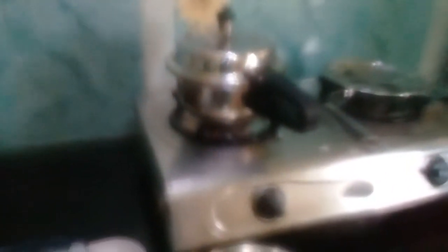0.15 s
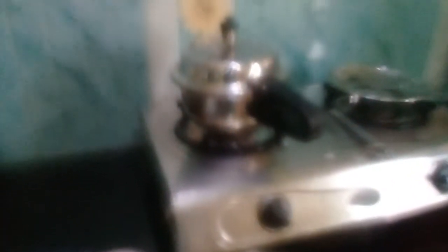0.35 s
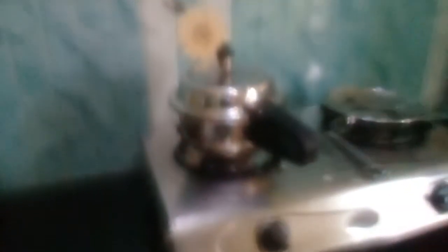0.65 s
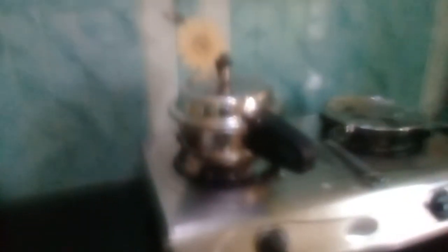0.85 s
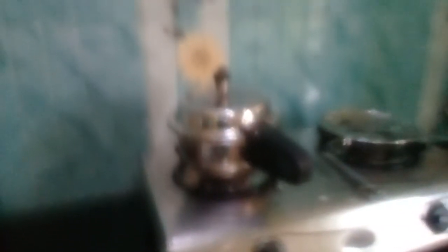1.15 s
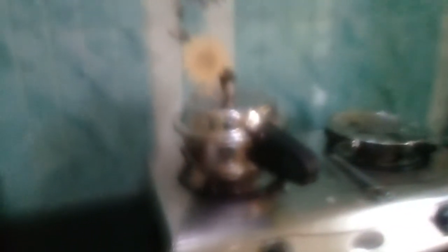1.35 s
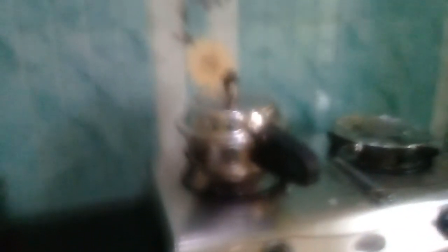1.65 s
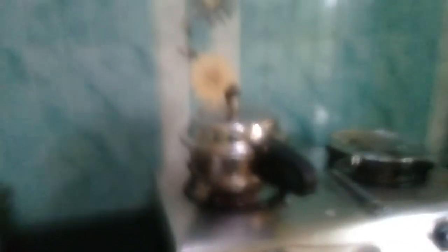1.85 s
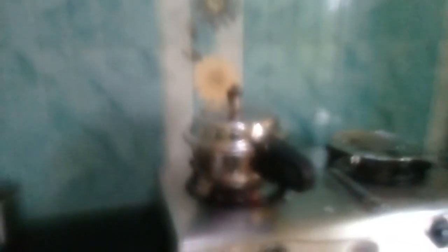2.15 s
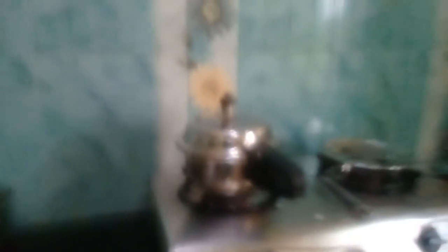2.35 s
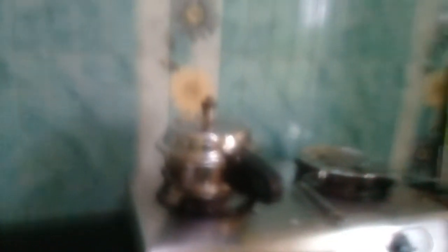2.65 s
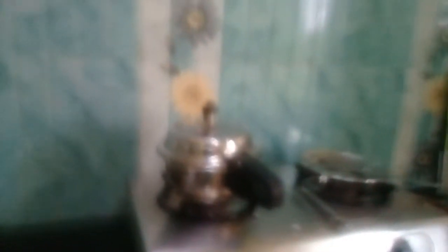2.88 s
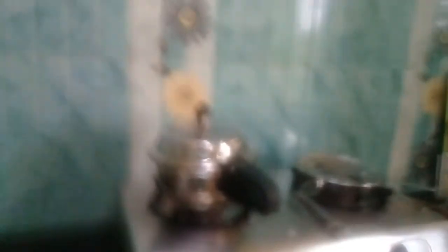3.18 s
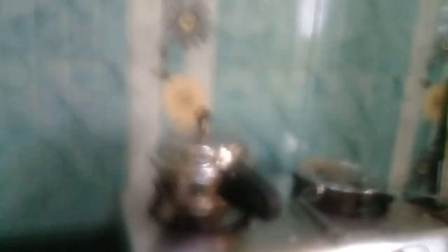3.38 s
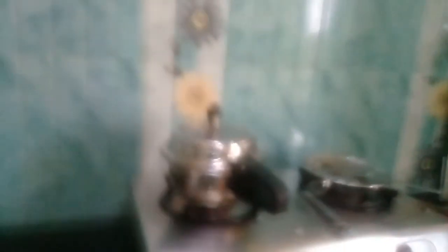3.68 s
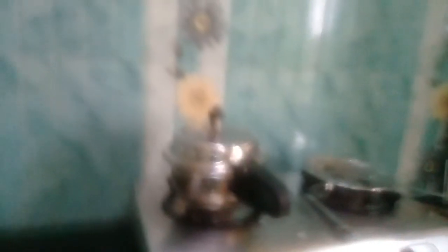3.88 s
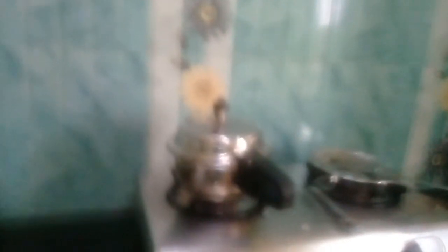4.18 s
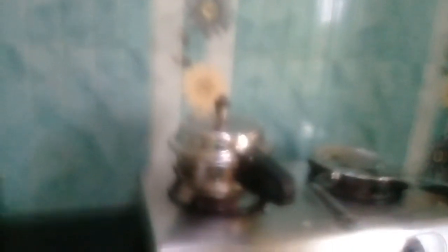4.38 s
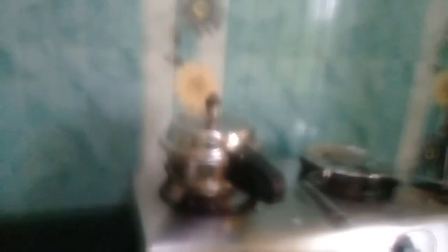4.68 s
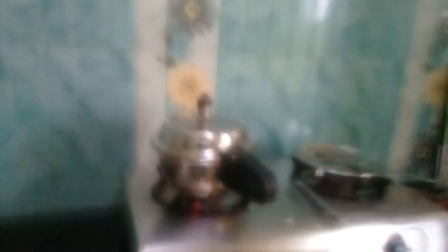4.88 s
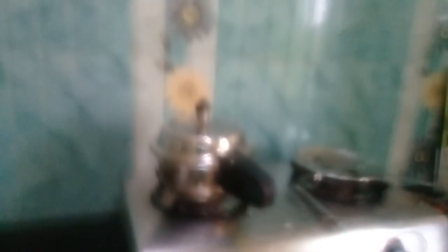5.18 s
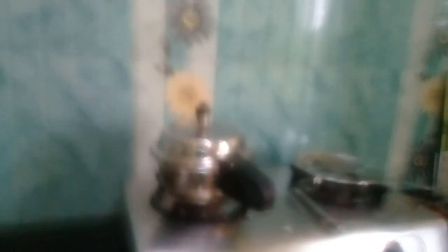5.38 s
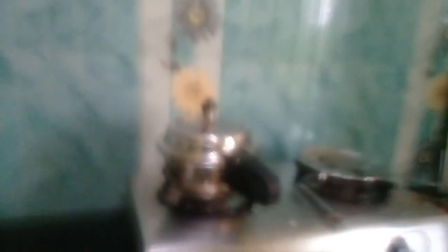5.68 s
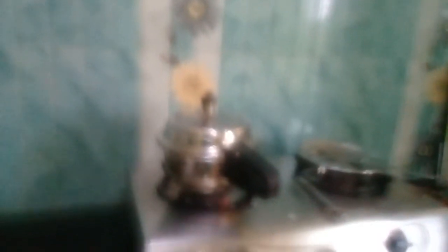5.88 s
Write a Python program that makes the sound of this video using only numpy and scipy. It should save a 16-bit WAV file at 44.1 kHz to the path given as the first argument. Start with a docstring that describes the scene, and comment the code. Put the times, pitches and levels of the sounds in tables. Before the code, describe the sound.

A small pressure cooker on a gas stove wheezes faintly, then its steam hiss swells into a strong, bright, fluttering jet over a low flame rumble.

```python
"""Pressure cooker on a gas flame

A small pressure cooker comes up to pressure in a tiled kitchen, heard by one hand-held microphone.
Steam under the weight valve, made of shaped noise, is first reedy wheezes through the resonant seat,
then a growing hiss that swings as the weight rocks, with thin whistles and bright wet puffs.
Decaying modes make a board's dull bumps and the pot's brief ticks; the board also scrapes.
Below lie the burner's rumble, as low shaped noise, and a mains hum of wavering sine tones."""
import sys
import numpy as np
from scipy import signal
from scipy.fft import rfft, irfft, next_fast_len
from scipy.io import wavfile
from scipy.ndimage import map_coordinates

SR = 44100
rng = np.random.default_rng(int(sys.argv[2]) if len(sys.argv) > 2 else 0)


def int16_out(signal):
    """Quantize to a 16-bit WAV file."""
    q = np.round(np.clip(np.atleast_2d(signal).T, -1, 1) * 32767)
    wavfile.write(sys.argv[1], SR, q.astype(np.int16))


N = 265923
TIME = np.arange(N) / SR  # s

# steam flow, building with pressure until the weight holds it: t/s, level/dB re full flow
FLOW = [(0, -20.5), (.22, -19), (.4, -17), (.84, -12.2), (1.12, -11), (1.36, -11), (1.5, -8), (1.95, -6.5),
        (2.45, -5), (3.0, -3.5), (3.35, -2.9), (3.9, -2.5), (4.3, -0.5), (4.75, 0.1), (5.05, -0.3),
        (5.3, 0.15), (5.75, 0.25), (6.03, -0.2)]
# steam lifts the weight, which rocks back: t/s, period of one rock/s, swing of the flow/dB
LIFTS = [(.315, .09, 1.5), (.6, .1, 1), (1.43, .1, 1.6), (1.625, 0.16, 2), (2.295, .11, 3),
         (2.41, .11, 0.5), (2.53, .11, 0.5), (2.645, 0.12, 2.5), (2.75, 0.095, 1.3), (3.105, 0.1, 1.3),
         (3.325, 0.21, 1.5), (3.52, .12, 0.3), (3.685, .1, 0.5), (3.805, 0.12, 1.3), (3.96, 0.15, 2.5),
         (4.09, 0.093, 2.3), (4.28, 0.13, 0.5), (4.495, 0.13, 3.5), (4.625, 0.1, 2), (4.76, 0.21, 1),
         (5.145, 0.12, 2.5), (5.64, .14, 0.5), (5.85, 0.19, 2), (6.0, .12, 4.5)]
ROCKS_TO_DECAY = 0.86  # rocks until the swing has fallen to 1/e
# the weight sinks back and chokes the jet: t/s of the centre, length/s, change of flow/dB
SETTLES = [(2.13, .2, -0.7), (2.818, .06, -2), (4.17, 0.11, -2), (5.092, .06, -0.3)]

# spectrum of the jet's hiss: f/Hz, relative level per Hz/dB
HISS_SPECTRUM = [(1500, -31.5), (2600, -17), (3600, -6.5), (5000, -6), (5600, -2.5), (6250, -0.5),
                 (7000, -3.5), (7650, 1), (8500, -1.5), (9300, 0), (10000, -0.5), (10800, -7),
                 (12000, -16.5), (16000, -38)]
# spectrum of the plume's lower rush: f/Hz, relative level per Hz/dB
RUSH_SPECTRUM = [(400, -16), (800, -10.5), (1200, -14), (1520, -9), (1900, 0), (2300, -2), (2700, 0.5),
                 (3400, -7.5), (5000, -17), (8000, -28)]
# spectrum of the finest spray: f/Hz, relative level per Hz/dB
SPRAY_SPECTRUM = [(9500, -39), (11200, -1), (11900, -4), (12300, -0.5), (12700, 1), (13050, -6),
                  (13400, -3), (13800, -1), (14200, -8), (15100, -4.5), (15600, -4.5)]
# narrow tones of the vent: f/Hz, relative level/dB
VENT_TONES = [(6104, 2), (6180, 0), (6295, 3.5), (6358, 2), (6667, 1), (6971, 0), (7331, 0), (7530, 1),
              (7714, 4), (8092, 3), (8587, 2), (9075, 1), (9190, 0), (9528, 2), (9881, 0)]
JET_DB = -38.0  # hiss at full flow
PLUME_DB, PLUME_GROWTH = -52, 0.5  # dB at full flow, dB per dB of flow
UNFORMED_DB, FORM_S = -9, 1  # the plume's shortfall at the start, and the time until it is formed
# the plume's rush swells and thins: t/s of the centre, length/s, level/dB
PLUME_DRIFT = [(.2, .35, -0.5), (1.0, 0.44, 1.5), (1.9, 0.63, -1.5), (2.52, .14, 2), (3.2, 0.28, -2),
               (3.62, 0.13, 0), (4.803, 0.12, 1), (5.22, 0.19, -1.5), (5.66, 0.3, 1.5)]

# resonances of the valve seat: f/Hz, half-width/Hz, relative level/dB
SEAT_MODES = [(2836, 110, 0.5), (3150, 300, -4), (3560, 105, 0.5), (4060, 50, -7), (4200, 800, -13.5)]
# wheezes through the seat: t/s, time held/s, level/dB, pitch ratio
WHEEZES = [(-0.08, 0.07, -50, 1.04), (.525, 0.17, -51.3, 1), (.76, 0.1, -56.5, 1), (1.68, 0.15, -49.5, .99),
           (1.91, 0.16, -55, 1.03), (2.5, 0.06, -54.5, 1), (4.1, .2, -52.5, 1), (5.08, 0.13, -48.5, .98)]
WHEEZE_ATTACK_S, WHEEZE_RELEASE_S = 0.093, 0.18
LEAK_DB, LEAK_GROWTH = -55, 0.95  # the seat's leak, growing with the flow: dB at full flow, dB per dB
# brief whistles of the valve: t/s of the centre, length/s, f/Hz, level/dB
WHISTLES = [(0.06, 0.26, 3740, -62), (.03, .22, 4240, -62), (.69, 0.22, 2850, -56), (.65, .12, 3550, -57.5),
            (.87, 0.17, 3550, -57), (.72, .34, 4060, -63), (1.83, 0.1, 2950, -57), (2.09, .16, 3660, -59),
            (2.59, .1, 2830, -57), (3.45, 0.24, 2606, -55)]

# puffs of wet steam: t/s, rise/s, level/dB
SPURTS = [(2.297, .015, -52), (3.697, .006, -41), (3.95, 0.032, -49), (4.24, 0.033, -51),
          (4.47, 0.051, -45.5), (5.24, .03, -46), (5.83, 0.048, -42.5)]
# spectrum of a puff's bright front: f/Hz, relative level per Hz/dB
SPURT_SPECTRUM = [(1000, -16), (2200, -5), (3500, 5), (4500, 6), (6000, -10), (11000, 5), (15000, -28)]
SPURT_DECAY_S, SPURT_TAIL_S = 0.051, 0.17  # time constants of the bright front and the dull tail

# dull bumps of the board: t/s, level/dB, pitch ratio
BUMPS = [(4.339, -33.5, 0.97), (4.349, -37.5, 1.0), (4.38, -32, 1.04), (4.404, -40, 1.12),
         (4.416, -38, 1.06), (4.476, -35.5, 1.2), (4.5, -44, 1.2), (4.518, -40, .88), (4.588, -45, 1.25)]
# modes of the board's short thud: f/Hz, relative level/dB, t60/s
BOARD_MODES = [(111, -14, 0.094), (290, -17, .045), (388, -9, 0.05), (425.6, -5.5, 0.072), (473, -16, .045)]
# modes of the board's lasting ring: f/Hz, relative level/dB, t60/s
BOARD_RING = [(263, -25, .45), (388, -27, .35), (423, -24, .35), (452, -28, .3), (512, -30, .3)]
# soft scrapes of the board: t/s of the centre, length/s, level/dB
SCRAPES = [(2.974, 0.27, -65), (4.43, 0.086, -54)]
# ticks of the pot: t/s, level/dB, pitch ratio
TICKS = [(5.7128, -34, 1), (5.7182, -33.5, 1.0), (5.728, -41, 0.97), (5.752, -38.5, 0.98)]
# modes of the pot: f/Hz, relative level/dB, t60/s
POT_MODES = [(970, -5, .026), (1110, -2, .034), (1285, -6.5, 0.022), (1950, -8, 0.025)]

# spectrum of the flame's rumble: f/Hz, relative level per Hz/dB
FLAME_SPECTRUM = [(15, -32), (45, -14), (60, -12.5), (86, -1.5), (115, -4.5), (160, -0.5), (225, -0.5),
                  (262, 0), (290, -4), (450, -8), (700, -12), (2000, -21), (8000, -31), (16000, -50)]
# low resonances in which the flame throbs: f/Hz, half-width/Hz, relative level/dB
THROB_MODES = [(194, 17, -0.5), (227, 18, 1), (263.5, 5.4, 0.5)]
# flares of the flame: t/s of the centre, length/s, level/dB
FLARES = [(0.362, .07, 3), (0.848, 0.96, 1.5), (1.05, .12, 1), (1.32, 0.15, 2), (1.78, 0.17, 1.5),
          (2.267, 0.34, 3), (2.9, 0.37, 3), (3.783, 0.17, 2.5), (4.036, 0.46, 5), (4.478, 0.31, 5),
          (5.54, 0.11, 1.5), (5.83, 0.22, 2), (.15, .2, 2.5)]
FLAME_DB, THROB_DB, DRONE_DB = -61.5, -65, -70  # flame and throb waver about these levels

# mains hum, lowest line first: f/Hz, level/dB
HUM_LINES = [(98.7, -63.5), (149.3, -64.5), (200, -70.5)]
# swells and fades of the lowest hum: t/s of the centre, length/s, level/dB
HUM_SWELLS = [(.33, .12, -7), (.62, .36, 1), (1.0, .14, 3), (1.32, .3, -5), (1.65, .1, -7), (1.92, .12, -7),
              (2.38, .14, -8), (2.7, .1, -7), (2.98, .1, -9), (3.7, .22, 4), (4.33, .2, 3), (4.52, .12, -5),
              (4.92, .12, -6), (5.5, .5, -3)]

TOP_HZ = 15750  # band limit of the recorder


def flow():
    """Pressure-driven flow in dB re full, swung by the damped oscillation of the rocking weight."""
    flow_db = np.interp(TIME, *np.transpose(FLOW))
    for s, period, swing_db in LIFTS:
        rocks = np.maximum(TIME - s, 0) / period
        decay = np.exp(-(rocks / ROCKS_TO_DECAY) ** 2)
        flow_db = flow_db + swing_db * np.sin(2 * np.pi * rocks) * decay
    return flow_db + swells(SETTLES, steep=2)


def steam(flow_db):
    """Jet noise: the vent hisses and sings, the plume rushes lower, and each part follows the flow."""
    flutter_db = 0.41 * wobble(19) + 0.52 * wobble(45) + 0.35 * wobble(120)
    tones = blown([(hz, 15, db) for hz, db in VENT_TONES])
    hiss = amp(JET_DB + flow_db) * (noise(HISS_SPECTRUM) + amp(-10.5) * tones)

    drift_db = swells(PLUME_DRIFT, steep=2)
    unformed_db = UNFORMED_DB * np.maximum(1 - TIME / FORM_S, 0)
    plume_db = PLUME_DB + PLUME_GROWTH * flow_db + unformed_db + drift_db
    plume = amp(plume_db) * noise(RUSH_SPECTRUM)

    # the finest spray grows faster than the hiss, so the jet brightens
    spray = amp(-45.5 + 1.27 * flow_db) * noise(SPRAY_SPECTRUM)
    # the hollow under the weight grows fastest of all, so it is faint until the flow is strong
    hollow = amp(-60.0 + 1.5 * flow_db + drift_db) * blown([(1192, 270, 0)])
    return amp(flutter_db) * (hiss + plume + spray + hollow)


def wheeze(flow_db):
    """Flow-excited resonance: wet steam forces the seat in reedy spells over a leak that grows with the flow."""
    reedy = amp(LEAK_DB + LEAK_GROWTH * flow_db) * blown([(3210, 670, 0)])
    for s, held, db, pitch in WHEEZES:
        opening = np.sin(np.pi / 2 * np.clip((TIME - s) / WHEEZE_ATTACK_S, 0, 1)) ** 2
        closing = np.exp(-(np.maximum(TIME - s - held, 0) / WHEEZE_RELEASE_S) ** 2)
        modes = [(pitch * hz, width, level) for hz, width, level in SEAT_MODES]
        reedy = reedy + amp(db) * opening * closing * blown(modes)
    return amp(1.1 * wobble(60)) * reedy


def whistles():
    """Narrow-band tones: the valve sounds brief, faint whistles that swell and fade."""
    out = np.zeros(N)
    for s, length, hz, db in WHISTLES:
        out += amp(db) * swell(s, length, steep=2) * whistle(hz, waver=0.005, flicker_db=3.5)
    return out


def whistle(hz, waver, flicker_db):
    """Random frequency and amplitude modulation make a thin, unsteady tone of rms 1."""
    phase = 2 * np.pi * np.cumsum(hz * (1 + waver * wobble(110))) / SR
    return unit(amp(flicker_db * wobble(70)) * np.sin(phase))


def spurts():
    """Transient turbulence: puffs of wet steam decay quickly at the front and leave a duller rush."""
    front = puffs(SPURT_DECAY_S) * noise(SPURT_SPECTRUM)
    tail = puffs(SPURT_TAIL_S) * blown([(2370, 790, 0)])
    return front + amp(-10.5) * tail


def puffs(decay):
    """Envelope of all puffs: a linear rise, then exponential decay with the given time constant."""
    envelope = np.zeros(N)
    for s, rise, db in SPURTS:
        rising = np.clip((TIME - s) / rise, 0, 1)
        envelope += amp(db) * rising * np.exp(-np.maximum(TIME - s - rise, 0) / decay)
    return envelope


def bumps():
    """Modal decay: each bump is a short thud, joined by the board's lasting ring at one fixed pitch."""
    ring = struck([(s, db, 1) for s, db, pitch in BUMPS], BOARD_RING, attack=0.008)
    return struck(BUMPS, BOARD_MODES, attack=0.0016) + ring


def scrapes():
    """Friction as continuous random excitation: the dragged board groans in its low modes."""
    envelope = sum(amp(db) * swell(s, length) for s, length, db in SCRAPES)
    return envelope * blown([(404, 43, 1), (500, 40, -18)])


def ticks():
    """Modal decay: the pot's modes die within hundredths of a second and are heard as ticks."""
    return struck(TICKS, POT_MODES, attack=0.0015)


def burner():
    """Combustion noise: the flame's low, uneven rumble flares now and then over a deep steady drone."""
    throb = amp(THROB_DB + 2.3 * wobble(11)) * blown(THROB_MODES)
    flame = amp(FLAME_DB + 1.0 * wobble(13)) * noise(FLAME_SPECTRUM)
    drone = amp(DRONE_DB) * blown([(38, 5, 0)])
    return amp(swells(FLARES)) * (flame + throb) + drone


def hum():
    """Line spectrum of the mains: the levels waver, and the lowest line swells and fades in lumps."""
    lines = []
    for hz, db in HUM_LINES:
        tone = np.abs(1 + 0.5 * wobble(9)) * np.sin(2 * np.pi * hz * TIME + 0.25 * wobble(7))
        lines.append(amp(db) * unit(tone))
    low, *upper = lines
    low = low + amp(-68.5) * blown([(96, 5.3, 0)])
    return amp(swells(HUM_SWELLS)) * low + sum(upper)


def kitchen(x, wet_db, t60):
    """Reverberation: tile reflections comb the sound, drifting as the hand-held microphone moves."""
    t = np.arange(SR // 3) / SR
    places = np.linspace(0, N, 5)  # samples at which each of five random echo tails is centred
    echo = np.zeros(N)
    for place in places:
        tail = rng.standard_normal(len(t)) * amp(-60 * t / t60) * (t > .002)
        reflected = signal.fftconvolve(x, unit(tail) / np.sqrt(len(t)))[:N]
        nearness = np.clip(1 - np.abs(np.arange(N) - place) / places[1], 0, 1)
        echo += np.sin(nearness * np.pi / 2) * reflected  # equal-power crossfade
    return (x + amp(wet_db) * echo) / np.sqrt(1 + amp(wet_db) ** 2)


def struck(blows, modes, attack):
    """Modal synthesis: each blow lands on a new spot, with its own pitch and mode strengths."""
    out, t = np.zeros(N + SR), np.arange(SR // 2) / SR
    for s, db, pitch in blows:
        ring = np.zeros(len(t))
        for hz, level, t60 in modes:
            decay = amp(level + rng.normal(0, 1) - 60 * t / t60)
            ring += decay * np.sin(2 * np.pi * pitch * hz * t)
        out[round(s * SR):][:len(t)] -= amp(db) * ring * (1 - np.exp(-t / attack))
    return out[:N]


def blown(modes):
    """Resonant filtering: turbulence rings (f/Hz, half-width/Hz, level/dB) modes, at rms 1."""
    def gain(f):
        return sum(amp(db) / (1 + ((f - hz) / width) ** 2) for hz, width, db in modes)
    return unit(filtered(rng.standard_normal(N), gain))


def noise(spectrum):
    """Spectral shaping: noise of rms 1 coloured by (f/Hz, level/dB) points on a log axis."""
    f, db = np.transpose(spectrum)
    def gain(hz):
        return amp(np.interp(np.log(hz + 1), np.log(f), db))
    return unit(filtered(rng.standard_normal(N), gain))


def filtered(x, response):
    """Linear filtering: the spectrum of x times a response of frequency."""
    size = next_fast_len(N + SR // 2)
    return irfft(rfft(x, size) * response(np.fft.rfftfreq(size, 1 / SR)), size)[:N]


def wobble(rate):
    """Band-limited modulation: a smooth random curve with rate knots a second."""
    knots = rng.standard_normal(int(N * rate / SR) + 4)
    return map_coordinates(knots, [np.arange(N) * rate / SR])


def swell(s, length, steep=4):
    """Envelope from 0 to 1 and back, centred on s: flat-topped, or rounder when less steep."""
    return np.exp(-np.abs(2 * (TIME - s) / length) ** steep)


def swells(table, steep=4):
    """Superposition in dB of the swells of a (t/s, length/s, level/dB) table."""
    return sum(db * swell(s, length, steep) for s, length, db in table)


def amp(db):
    """Logarithmic level: decibels to amplitude gain."""
    return 10 ** (np.asarray(db) / 20)


def unit(x):
    """Normalization to rms 1."""
    return x / np.sqrt(np.mean(x ** 2) + 1e-20)


def scene():
    """Superposition: cooker and knocks with reflections, burner and hum direct, in two equal channels."""
    flow_db = flow()
    vented = steam(flow_db) + wheeze(flow_db) + whistles() + spurts()
    cooker = kitchen(vented, wet_db=-8, t60=.18)
    knocks = kitchen(bumps() + ticks() + scrapes(), wet_db=-11, t60=.4)
    mono = cooker + knocks + burner() + hum()
    return np.array([mono, mono])


def record(dry):
    """Band limitation: the recorder keeps nothing above its top frequency."""
    return np.array([filtered(channel, lambda hz: hz < TOP_HZ) for channel in dry])


dry = scene()
out = record(dry)
int16_out(out)
```